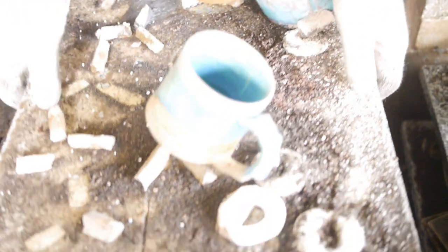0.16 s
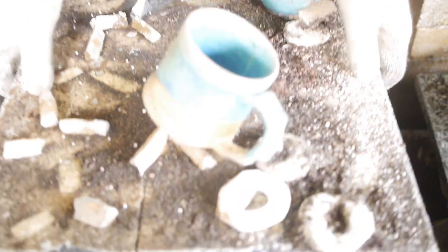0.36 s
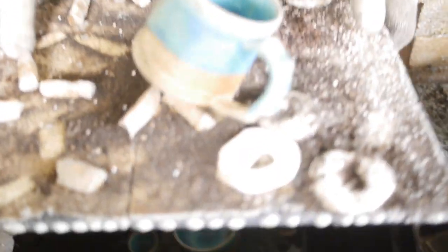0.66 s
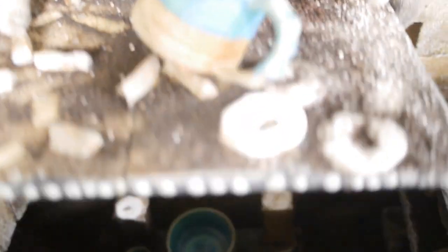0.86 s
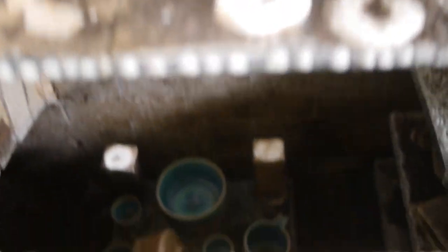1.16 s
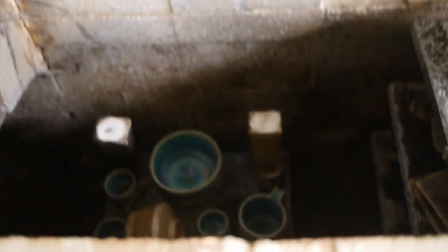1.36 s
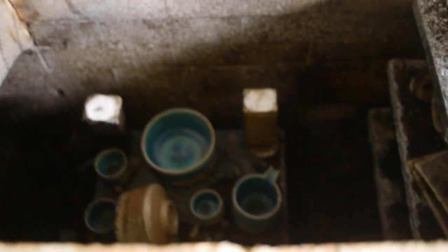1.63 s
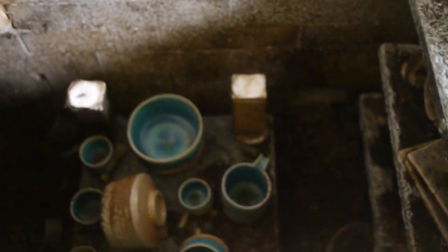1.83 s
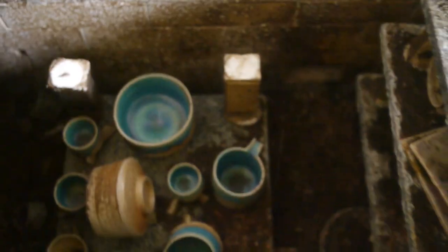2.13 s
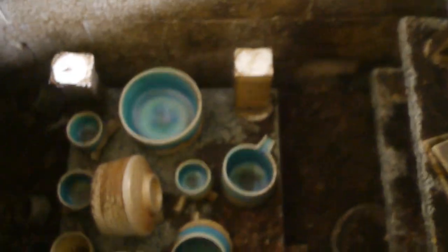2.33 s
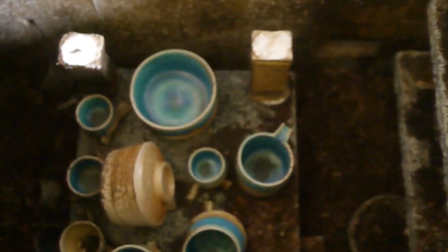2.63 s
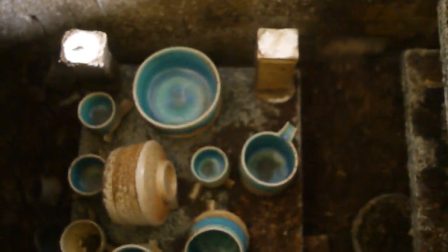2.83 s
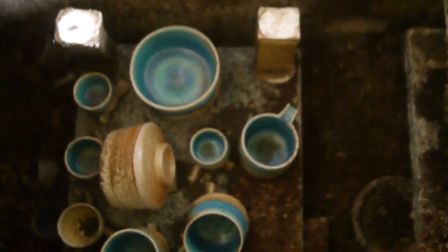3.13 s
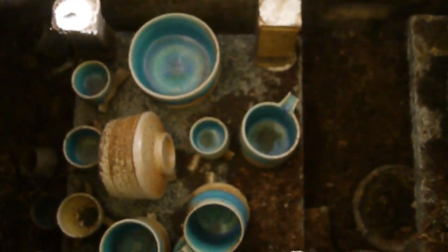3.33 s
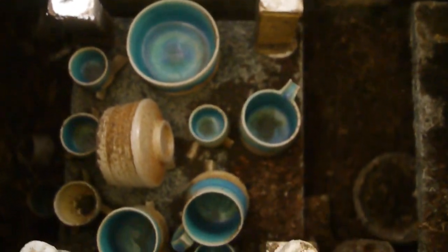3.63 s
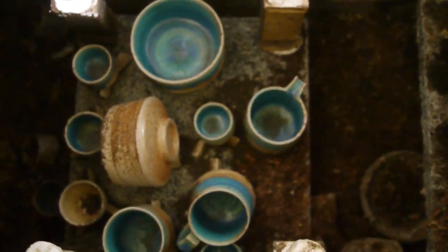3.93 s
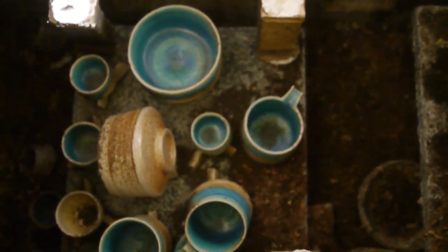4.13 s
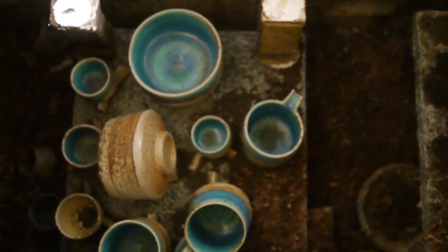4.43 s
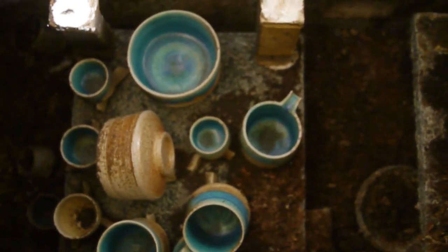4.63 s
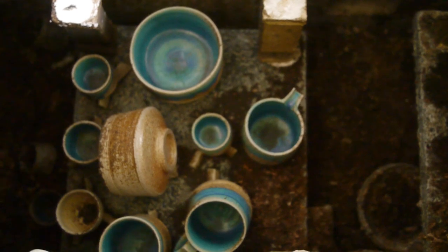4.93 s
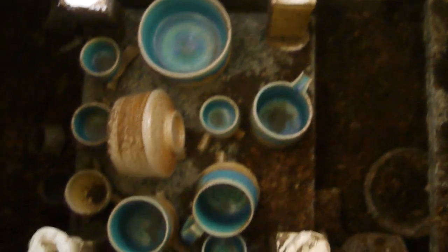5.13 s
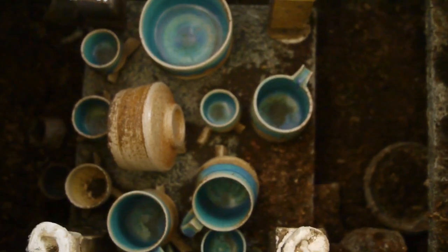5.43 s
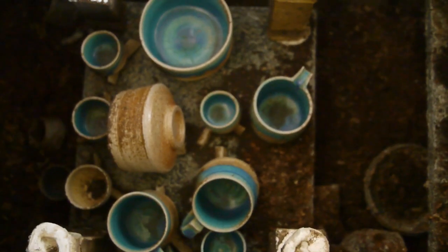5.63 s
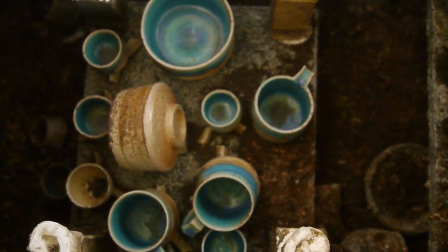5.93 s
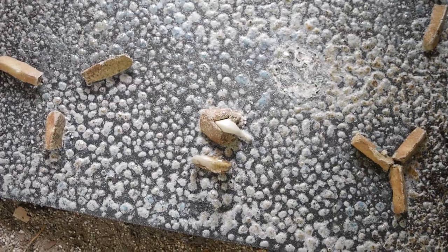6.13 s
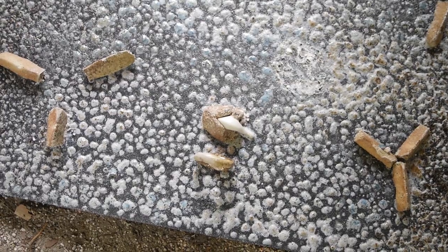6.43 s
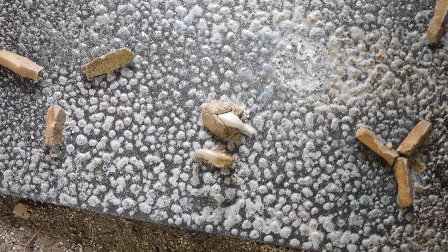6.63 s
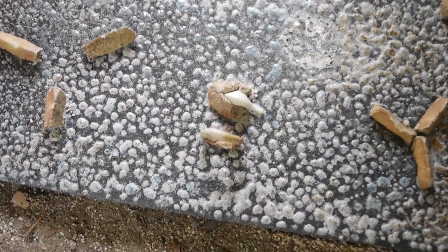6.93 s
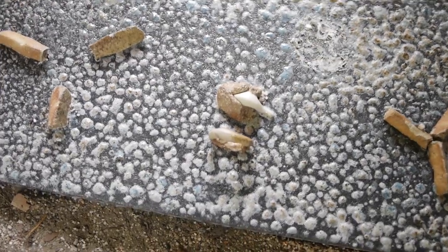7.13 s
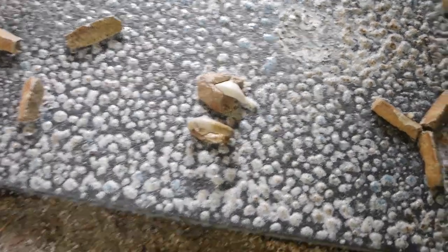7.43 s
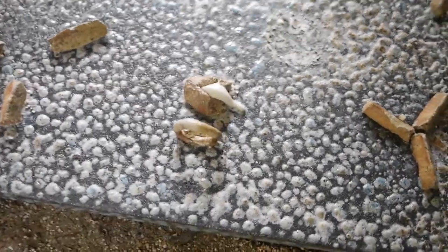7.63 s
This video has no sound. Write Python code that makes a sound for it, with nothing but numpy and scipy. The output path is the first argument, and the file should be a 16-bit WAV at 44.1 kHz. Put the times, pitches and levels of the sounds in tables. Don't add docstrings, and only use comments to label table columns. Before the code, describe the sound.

A soft, distant yard hush lies under everything. From 0.4 to 3.3 s only faint clay ticks and short dry scuffs occur, with a small cluster around 2.0 to 2.7 s. At 3.6 s grit begins to scrape; pots tap at 3.9 s, a cup clinks twice near 4.1 s, and the loudest sound, a bright jar clank with a rebound, comes at 4.26 s. From 4.57 to 5.1 s a pot is dragged, crunching grit and tapping rapidly, with firm bowl knocks at 4.62, 4.66 and 5.05 s and low shelf thuds. Scattered scuffs and glaze pings follow, then a double knock at 5.79 s. Brick walls add short echoes. At 6.08 s the place changes abruptly: quieter, less echo, tiny close clicks, dull hollow hand rubbing around 7.0 to 7.7 s, and firmer snaps at 7.59 s, as the hush slowly rises.

```python
import sys
import numpy as np
from scipy import signal
from scipy.fft import rfft, irfft, next_fast_len
from scipy.io import wavfile
from scipy.ndimage import uniform_filter1d

SR = 44100
rng = np.random.default_rng(int(sys.argv[2]) if len(sys.argv) > 2 else 0)


def gain_from_decibels(decibels):
    exponent = np.asarray(decibels, float) / 20
    return 10 ** exponent


def inscribe(sig):
    pcm = np.round(np.clip(np.atleast_2d(sig).T, -1, 1) * 32767)
    wavfile.write(sys.argv[1], SR, pcm.astype(np.int16))


N = 343165
CUT_S = 6.08

# (frequency [Hz], width [Hz], level [dB])
DRAGGED_MODES = [(892, 25, -2), (1124, 36, 0), (1340, 25, -8), (1600, 40, -8), (1898, 40, -1),
                 (1986, 40, -1), (2170, 37, -6), (2680, 46, -8), (2900, 51, -9), (3470, 60, -12),
                 (5070, 45, -14), (5780, 70, -21), (4100, 90, -15), (7050, 90, -13), (8620, 250, -20)]


def bowl():
    # (frequency [Hz], level [dB], time to fall 60 dB [s])
    modes = [(888, 1, 0.13), (1126, 0, 0.12), (1600, -18, 0.15), (1790, -7, 0.1), (1978, 0, 0.12),
             (2170, -3, 0.05), (3370, -17.5, 0.19), (3840, -35, 0.26), (4620, -28, 0.23), (5373, -35, 0.15),
             (6200, -28, 0.095), (7200, -36, 0.12), (8620, -40, 0.08)]
    # (time [s], peak [dB], crack over ring [dB], hardness [dB per octave], bounce [ms])
    blows = [
        (3.887, -29, 0, 4.5, 4.6),
        (3.966, -37.5, 6.5, -4, 5),
        (4.618, -25, 4, 5, 10.7),
        (4.664, -23.5, 1.5, 9, 20),
        (4.983, -28, 2, 9, 1.7),
        (5.049, -22, -4, 8, 3.5),
        (5.7865, -23, -5, 6.5, 4.2),
        (5.796, -26, -3, 0.5, 3),
    ]
    return knocks(blows, modes, rough=0.33, pan_db=1.5)


def jar():
    # (frequency [Hz], level [dB], time to fall 60 dB [s])
    modes = [(576, -20, 0.31), (1266, -17, 0.15), (1631, -20, 0.24), (2203, -16, 0.12), (2860, -15, 0.15),
             (3278, -15, 0.15), (3500, -11, 0.15), (3365, -7, 0.16), (3650, -5, 0.12), (4005, -15, 0.19),
             (5098, -34, 0.27), (5389, -23, 0.22), (5932, -17, 0.18)]
    # (time [s], peak [dB], crack over ring [dB], hardness [dB per octave], bounce [ms])
    blows = [
        (4.257, -16, 2, 0.72, 7),
        (4.274, -24, 2, 0, 9),
    ]
    return knocks(blows, modes, rough=0.35, pan_db=1.5)


def cup():
    # (frequency [Hz], level [dB], time to fall 60 dB [s])
    modes = [(960, -21, 0.1), (1550, 8, 0.073), (1870, -1, 0.27), (2387, 4, 0.09), (2800, -8, 0.042),
             (3010, 2, 0.09), (3170, -13, 0.029), (4080, 0, 0.036), (4830, -35, 0.33)]
    # (time [s], peak [dB], crack over ring [dB], hardness [dB per octave], bounce [ms])
    blows = [
        (4.0925, -30, 0.27, 0.15, 8),
        (4.108, -30, 2, 0, 25),
        (4.146, -31.5, 0.53, 0.19, 10),
        (4.163, -34, 0.27, 1.3, 6.7),
        (5.676, -40.5, 1.9, 7.8, 11),
    ]
    return knocks(blows, modes, rough=0.45, pan_db=1.0)


def knocks(blows, modes, rough, pan_db):
    out, t = np.zeros((2, N)), np.arange(SR // 4) / SR
    for s, peak_db, crack_db, hard_db, bounce_ms in blows:
        bounce = np.exp(-1000 * t / np.clip(bounce_ms, 1, 40)) * (1 - np.exp(-t / 0.0014))
        contact = rng.standard_normal(len(t)) ** 3 * bounce
        contact[:8] += 3.6 * np.hanning(8)
        pot = np.zeros((2, len(t)))
        for hz, db, t60 in modes:
            aim = rng.uniform(-1.6, 1.6, (2, 1)) * hz / 3000
            noise = spread(rng.standard_normal((2, len(t))), wide=0.82)
            cluster = evened(ring(noise, hz, 25 + 0.028 * hz))
            drive = abs(contact[:4000] @ np.exp(2j * np.pi * hz * t[:4000]))
            reach = np.clip(drive / np.linalg.norm(contact), .3, 3)
            fade = gain_from_decibels(db + hard_db * np.log2(hz / 2000) - 60 * t / min(t60, .3))
            tone = np.sin(2 * np.pi * hz * t + aim)
            pot += fade / reach * (tone + rough * cluster * gain_from_decibels(-60 * t / 4.2))
        ringing = signal.fftconvolve(contact[None], pot, axes=1)[:, :len(t)]
        spray = spread(rng.standard_normal((2, len(t))), wide=0.43)
        spray = spray * gain_from_decibels(-60 * t / 0.23) * (1 - np.exp(-t / 0.0029))
        crack = band(band(contact + 0.74 * spray, 490, 4500 * gain_from_decibels(hard_db)), 370, 5160)
        blow = ringing / abs(ringing).max() + gain_from_decibels(crack_db) * crack / abs(crack).max()
        add(out, s, gain_from_decibels(peak_db) * panned(blow, pan_db))
    return out


def drag():
    # (hardest push [s], level [dB], swell [s per 20 dB], fade [s per 20 dB], fine grit [dB])
    strokes = [(3.64, -67, 0.2, 0.3, 11.5), (3.719, -55, 0, 0.4, 1.5), (3.925, -51, 0, -0.5, -1),
               (3.979, -48, 0.16, 0.36, -2.5), (4.075, -58, -1, -0.5, -4.5), (4.33, -45.5, 0.5, 0.4, -24),
               (4.571, -37, .004, .4, -7), (4.622, -32, 0.06, -0.06, -15), (4.7, -36, 0.19, 0.03, -5.5),
               (4.92, -41, 0, .5, -22), (5.058, -31, 0.29, 0.0976, -4.5), (5.26, -47.5, -1.44, 0, 0),
               (5.52, -63, 0, 0, -3), (5.775, -48, 0, 0.28, -1.5), (5.85, -60, .03, 0.48, -14),
               (6.0, -57, -6, 0.2, -13)]
    # (frequency [Hz], level [dB per Hz])
    grit_colour = [(150, -7.5), (650, -6), (790, -16), (1100, -17.5), (1940, -7), (7040, -8.5),
                   (14000, -12.5), (16000, -35)]
    dust_db, dust_per_fine = -10.5, 1
    ring_share, ring_per_db = .7, .03
    t = np.arange(round(3.5 * SR), round(CUT_S * SR)) / SR

    lumps = gain_from_decibels(1.8 * evened(band(rng.standard_normal(len(t)), 24.4, 109)))
    size = gain_from_decibels(3.0 * np.minimum(rng.exponential(1, (2, len(t))), 2.5))
    size = size * (rng.random((2, len(t))) < 9000 / SR)
    grains = spread(rng.standard_normal((2, len(t))) * size * lumps, wide=0.67)

    pot, rim = np.zeros((2, 2, len(t)))
    for hz, width, db in DRAGGED_MODES:
        rocking = gain_from_decibels(3.0 * evened(band(rng.standard_normal(len(t)), 3, 25)))
        tone = gain_from_decibels(db) * ring(grains * rocking, hz, 0.8 * width) / np.sqrt(width)
        add(pot if hz < 4500 else rim, 0, tone)
    ringing, bright = evened(pot), evened(rim)

    rough = colour(grains, lambda hz: gain_from_decibels(read(grit_colour, hz)))
    coarse = evened(band(rough, 300, 5000))
    fine = evened(band(rough, 3800, 9500))
    dust = evened(band(band(grains, 7500, 14500), 7500, 16000))

    s, level_db, swell, fade, fine_db = np.transpose(strokes)
    swell, fade = swell[:, None], fade[:, None]
    push = peaks(level_db, s, swell, fade, t)
    fizz = peaks(level_db + fine_db, s, swell, fade, t)
    haze = peaks(level_db + dust_db + dust_per_fine * fine_db, s, swell, fade, t)
    push_db = 20 * np.log10(push)
    share = np.clip(ring_share + ring_per_db * (push_db + 35), 0, 1)
    pressed = np.clip((push_db + 50) / 15, 0, 1)
    body = 1.14 * np.sqrt(share) * ringing + np.sqrt(1 - share) * coarse
    out = np.zeros((2, N))
    add(out, t[0], gain_from_decibels(-5.0) * (push * body + fizz * (0.83 * pressed * bright + fine) + haze * dust))
    return out


def notes():
    # (time [s], peak [dB], brightness [dB per octave])
    foot_taps = [(4.5748, -44, 3), (4.6026, -30.5, 9), (4.6564, -28.5, -2), (4.6685, -30, -3),
                 (4.696, -35, -7), (4.7862, -34.5, 3), (4.8325, -51, 1), (4.856, -41, -3), (4.8836, -39, 0),
                 (4.9085, -61, -6), (4.928, -34, 3), (4.9375, -32, 7), (4.9631, -33, 11), (4.9821, -35, -4),
                 (5.0099, -29, 4), (5.0357, -32, 4), (5.062, -25.5, 2), (5.115, -43, 7.5), (5.137, -62, 2)]
    # (time [s], peak [dB], frequency [Hz], time to fall 60
    # dB [s])
    struck_tones = [(0.623, -52.5, 286, 0.086), (2.342, -44.5, 650, 0.07), (2.35, -51, 778, .2),
                    (2.35, -50.5, 1080, 0.26), (2.345, -54, 1780, .08), (2.37, -54, 1650, 0.092),
                    (2.41, -57, 682, .12), (3.887, -38, 1148, 0.087), (3.887, -47, 2970, 0.032),
                    (3.967, -38, 2510, .05), (3.967, -42, 1050, 0.07), (3.975, -44, 1975, 0.1),
                    (3.976, -50.5, 5600, .14), (3.97, -50, 723, 0.18), (4.092, -38.5, 4070, 0.11),
                    (4.101, -40, 1500, 0.13), (4.1, -42, 3010, 0.19), (4.1, -53, 5580, .12),
                    (4.11, -44, 3530, 0.21), (4.147, -36, 1780, .07), (4.165, -42, 1620, 0.067),
                    (4.169, -39.5, 1266, 0.15), (4.251, -37, 1940, .03), (4.2575, -11, 3700, 0.019),
                    (4.262, -23.5, 2480, 0.15), (4.615, -35.5, 662, 0.11), (4.984, -33.5, 2360, 0.1),
                    (5.79, -37.5, 1190, 0.22), (5.69, -52, 1126, 0.28), (5.6, -58, 1770, 0.28),
                    (3.967, -48.5, 1500, 0.25), (5.799, -39, 2930, 0.074), (5.841, -48.5, 496, 0.11),
                    (4.1, -47, 4970, .3), (4.1, -46, 580, 0.39), (4.6, -30, 2195, .06),
                    (4.62, -32, 2720, .07), (4.928, -34, 2130, 0.055), (5.115, -44, 2200, .12),
                    (6.04, -64, 704, 0.092), (7.733, -46, 620, 0.032)]
    # (time [s], peak [dB], frequency [Hz], time to fall 60
    # dB [s])
    more_tones = [(3.876, -50, 7050, .06), (3.876, -51, 9000, .1), (3.876, -52, 10900, .1),
                  (3.882, -51, 14500, .08), (4.258, -24, 2700, 0.055), (4.259, -28, 4550, .09),
                  (4.262, -33, 6000, .12), (4.619, -34, 6950, .07), (4.655, -40, 7050, .1),
                  (4.662, -37, 8600, .1), (4.59, -42, 5600, .06), (4.865, -43, 892, .4), (4.91, -48, 4100, .12),
                  (4.984, -32, 1125, 0.24), (4.98, -38, 6400, .05), (5.075, -41, 8500, .1),
                  (5.68, -49, 2720, .3), (5.698, -50, 8700, .08), (5.788, -40, 6100, .05),
                  (5.788, -42, 9800, 0.047), (5.79, -48, 14400, .06), (5.8, -45, 6200, 0.062),
                  (5.961, -57, 8200, .05), (6.358, -66, 14250, .12), (5.787, -30, 1980, .22),
                  (5.79, -33, 890, .18), (5.788, -42, 3800, .04), (4.79, -42, 1900, .2),
                  (5.035, -33, 1985, .15), (5.515, -56, 2720, .4), (2.76, -58, 655, .4), (.995, -60, 2690, .2)]
    tap_t60_s = 0.095
    out, t = np.zeros((2, N)), np.arange(SR // 4) / SR
    low_modes = [mode for mode in DRAGGED_MODES if mode[0] < 3200]
    hz, width, db = np.transpose(low_modes)[..., None]
    for s, peak_db, bright_db in foot_taps:
        grip_db = 2.7 * rng.standard_normal(hz.shape)
        start_db = db + grip_db + bright_db * np.log2(hz / 1500)
        modes = gain_from_decibels(start_db - 60 * t / tap_t60_s * width / 40) * np.sin(2 * np.pi * hz * t)
        add(out, s, gain_from_decibels(peak_db - 12.0) * modes.sum(0))
    for s, peak_db, hz, t60 in struck_tones + more_tones:
        add(out, s, gain_from_decibels(peak_db) * partial(t, hz, t60) * (1 - np.exp(-t / 0.00033)))
    return panned(out, pan_db=2.5)


def thud():
    # (frequency [Hz], width [Hz], level [dB])
    slab = [(242.3, 21, 4), (294, 17, 7), (338.3, 10.3, 6.5)]
    # (time [s], level [dB], deep part [dB])
    blows = [
        (3.889, -48.5, -62),
        (4.1, -50, -83),
        (4.17, -54, -78),
        (4.279, -39.5, -61),
        (4.58, -51, -67),
        (4.66, -44.5, -59),
        (4.87, -52.5, -66),
        (4.96, -48, -59),
        (5.049, -47.5, -61.5),
        (5.792, -46, -50),
    ]
    rise_s, fall_db_per_s, deep_fall_db_per_s = 0.011, 117, 69
    t = np.arange(round(3.7 * SR), round(CUT_S * SR)) / SR
    s, level_db, deep_db = np.transpose(blows)
    push, out = rng.standard_normal(len(t)), np.zeros(N)
    upper = sum(gain_from_decibels(db) * ring(push, hz, width) for hz, width, db in slab)
    upper = evened(band(upper + 0.17 * band(push, 146, 230), 153, 403))
    deep = evened(band(band(push, 70, 165), 70, 165))
    boom = peaks(level_db, s, rise_s, 20 / fall_db_per_s, t) * upper
    rumble = peaks(deep_db, s + 0.031, 3 * rise_s, 20 / deep_fall_db_per_s, t) * deep
    add(out, t[0], boom + rumble)
    return out


def crumbs():
    # (time [s], peak [dB], brightness [dB])
    kiln_ticks = [(0.745, -41, -5), (1.1994, -48, -9), (1.9193, -49, -7), (2.05, -43, 11),
                  (2.0614, -44, 17), (2.124, -39.5, -5), (2.4108, -44, 14), (2.436, -46.5, 16),
                  (2.4703, -56, -23), (2.6556, -49, -10), (2.6842, -42.5, -4), (3.786, -48, 25),
                  (3.829, -41, 23), (3.9665, -32, 0), (4.0496, -48, 20), (5.0505, -21, 5), (5.062, -23, -2),
                  (5.758, -45, 16), (4.092, -20.5, 1.5), (5.8994, -69.5, -2)]
    # (time [s], peak [dB], brightness [dB])
    close_ticks = [(6.109, -50, -3), (6.2333, -45, 0), (6.299, -59, 26), (6.3086, -52.5, 15.5),
                   (6.3388, -42.5, 24.5), (6.519, -44, 18), (6.5964, -47, 0), (6.635, -42, -3),
                   (6.6515, -46.5, -13), (6.871, -48, -5.5), (6.894, -49, -2), (7.054, -37.5, -10),
                   (7.1476, -38.5, -11.5), (7.2433, -44, -18.5), (7.364, -45.5, -2), (7.482, -43, -14.5),
                   (7.586, -31.5, -14), (7.592, -29, -8), (7.673, -37.5, 26), (7.7514, -51, -2)]
    # (time [s], peak [dB], ring [Hz], 0 for none, brightness [dB], length [ms])
    far_scuffs = [(0.444, -55, 5800, -1, 19), (0.49, -50, 1380, -3, 24), (0.607, -45, 2000, -5, 17),
                  (0.62, -39.5, 0, 0, 24), (0.9911, -49, 2690, -6, 29), (1.2644, -53, 680, -9, 27),
                  (1.8294, -55.5, 0, 5, 23), (2.0699, -45.5, 1060, -1, 39), (2.2493, -45, 0, 0.5, 26),
                  (2.3414, -52.5, 1513, -17, 32), (2.4005, -56, 1103, -13, 28),
                  (2.7544, -54, 655, -8.5, 57), (3.2794, -54, 1210, 3, 18)]
    # (time [s], peak [dB], ring [Hz], 0 for none, brightness [dB], length [ms])
    near_scuffs = [(3.8743, -42, 7150, 14.5, 28), (4.2565, -21, 3671, -4, 39), (4.464, -42, 3010, -6.5, 25),
                   (5.2074, -30, 2496, 0, 19.6), (5.2375, -35, 2780, 2.5, 7.6),
                   (5.2588, -39.5, 5070, -3.5, 27), (5.3854, -47.5, 5050, -1.5, 17),
                   (5.5151, -45, 5019.5, -1.5, 79), (5.5902, -47.5, 2720, -1, 69),
                   (5.678, -40, 6400, 3, 10), (5.698, -38, 2720, 3, 12), (3.72, -50, 0, 10, 20),
                   (4.05, -52, 0, 10, 20), (5.8694, -51, 5900, -11, 20), (5.9209, -44, 4000, 6, 14),
                   (6.03, -54.5, 999, -5.5, 40), (5.959, -52.5, 2278, 10, 15), (6.158, -49, 0, 0, 5.5),
                   (6.3435, -46, 0, 5, 4.4), (6.35, -47, 0, 5, 8), (6.365, -51, 0, 4, 10),
                   (6.7036, -53, 2830, -3, 13), (6.7331, -53.5, 3200, -3, 14), (7.5456, -47, 680, 0, 100),
                   (7.5792, -41, 783, -9, 15), (7.589, -35.5, 2742, -6.5, 8.3)]
    # (time [s], peak [dB], frequency [Hz], time to fall
    # 60 dB [s])
    pings = [(.487, -61, 3270, .6), (.545, -70, 10050, .12), (.632, -57, 3500, .2), (2.25, -53, 1900, .15),
             (2.83, -68, 9000, .15), (3.0, -68, 9050, .1), (3.875, -41, 3892, .36),
             (4.162, -28, 3009, .045), (4.258, -24, 3600, .13), (4.258, -28, 3713, .15),
             (4.258, -29, 3782, .12), (4.262, -45, 3027, .7), (4.262, -47, 3480, .5),
             (4.265, -27, 2299, .28), (4.325, -44, 5100, .08), (4.62, -38, 4300, .12),
             (5.05, -33, 7050, .11), (5.24, -41, 2900, .1), (5.8, -46, 4635, .25), (5.79, -45, 1340, .28),
             (6.225, -73, 9900, .12), (6.345, -58, 12200, .15)]
    tick_low_db, tick_high_db, scuff_low_db, scuff_high_db = -18.5, -21, -8, -7
    out, t = np.zeros((2, N)), np.arange(SR // 16) / SR
    for s, peak_db, bright_db in kiln_ticks + close_ticks:
        snap = rng.standard_normal(len(t)) * (np.exp(-t / 0.00022) + 0.13 * np.exp(-t / 0.01))
        snap[:2] += [2.5, 0]
        tick = three_bands(snap, tick_low_db - bright_db, tick_high_db + bright_db, top_hz=15400)
        add(out, s, gain_from_decibels(peak_db - 2.5) * panned(tick, pan_db=4.0 if s < CUT_S else -7.0))

    t = np.arange(SR // 4) / SR
    for s, peak_db, hz, bright_db, length_ms in far_scuffs + near_scuffs:
        low_db, high_db = scuff_low_db - bright_db, scuff_high_db + bright_db
        fade = np.exp(-1000 * t / np.clip(length_ms, 3, 90)) * (1 - np.exp(-t / 0.00028))
        scratch = spread(rng.standard_normal((2, len(t))) * fade, wide=0.56)
        tone = ring(scratch, hz, 10 + 0.036 * hz)
        tone_gain = (hz > 0) * 0.85 * (gain_from_decibels(low_db) if hz < 1500 else 1)
        tone = tone_gain * tone / abs(tone).max()
        add(out, s, gain_from_decibels(peak_db - 3.5) * (three_bands(scratch, low_db, high_db, top_hz=11900) + tone))

    t = np.arange(SR // 2) / SR
    for s, peak_db, hz, t60 in pings:
        add(out, s, gain_from_decibels(peak_db) * partial(t, hz, t60) * (1 - np.exp(-t / 0.00016)))
    return out


def rub():
    # (time [s], level [dB])
    strength = [
        (6.9, -81),
        (7.034, -66.5),
        (7.198, -64),
        (7.662, -72),
        (7.78, -81),
    ]
    s, level_db = curves(strength)
    noise, out = rng.standard_normal(len(level_db)), np.zeros(N)
    lumps = gain_from_decibels(3.6 * evened(band(rng.standard_normal(len(noise)), 10, 47)))
    hollow = ring(ring(noise, 820, 520), 920, 1000)
    friction = evened(hollow + 0.51 * band(noise, 230, 460))
    add(out, s, gain_from_decibels(level_db - 1.0) * lumps * friction)
    return out


def kiln(x):
    # (frequency [Hz], time to fall 60 dB [s])
    chamber = [(200, 0.25), (1000, 0.082), (4000, 0.14), (12000, 0.04)]
    taps = np.zeros((2, SR // 2))
    at = np.arange(60, SR // 2 - 20, 20) + rng.integers(0, 20, (2, (SR // 2 - 61) // 20))
    np.put_along_axis(taps, at, rng.choice([-1., 1.], at.shape), 1)
    taps[1] = 1.0 * taps[0] + 0.71 * taps[1]
    hz, t, z = signal.stft(taps, SR, nperseg=256)
    tail = signal.istft(z * gain_from_decibels(-60 * t / read(chamber, hz)[:, None]), SR, nperseg=256)[1]
    return signal.fftconvolve(x[None], tail / np.linalg.norm(tail[0]), axes=1)[:, :N]


def hush():
    # (frequency [Hz], level [dB per Hz])
    yard_colour = [(12, -70), (20, -56), (96, -17.5), (262, -3), (399, -6.5), (1120, -4.5), (3950, -10.5),
                   (12000, -32), (16000, -33)]
    # (frequency [Hz], level [dB per Hz])
    close_colour = [(15, -45), (137, -12), (575, -8.5), (800, -8.5), (1400, -13), (3500, -15.5),
                    (12200, -29.5), (16000, -37)]
    # (frequency [Hz], correlation [-1 to 1])
    likeness = [(60, 0.051), (150, 0.98), (380, 0.52), (950, 0.11), (2380, 0.53), (5980, -0.033),
                (15000, -0.27)]
    yard_db, close_db = -60.5, -64.5
    nearing_s, nearing_db_per_s = 7.1, 5
    frames, hz = N // 256 + 5, np.fft.rfftfreq(1024, 1 / SR)
    a, b, c, d, patches = rng.standard_normal((frames, 513, 5)).T
    patches = uniform_filter1d(uniform_filter1d(patches, size=14, axis=0), size=10, axis=1)
    patches = evened(patches)
    flicker = evened(uniform_filter1d(rng.standard_normal(frames), size=4))
    same = np.clip(read(likeness, hz), -1, 1)[:, None]
    left = a + 1j * b
    right = same * left + np.sqrt(1 - same ** 2) * (c + 1j * d)
    before, after = gain_from_decibels(read(yard_colour, hz)), gain_from_decibels(read(close_colour, hz))
    before, after = before / np.linalg.norm(before), after / np.linalg.norm(after)
    shape = np.where(np.arange(frames) * 256 / SR < CUT_S, before[:, None], after[:, None])
    z = np.array([left, right]) * shape * gain_from_decibels(1.14 * patches + 0.29 * flicker)
    x = evened(signal.istft(z, nperseg=1024, noverlap=768)[1][:, :N])
    t = np.arange(N) / SR
    swelling_db = close_db + nearing_db_per_s * np.maximum(t - nearing_s, 0)
    return x * gain_from_decibels(np.where(t < CUT_S, yard_db, swelling_db))


def ports(left, right):
    # (frequency [Hz], phase [rad])
    lead = [(0, 2), (860, -0.55), (2150, -0.84), (3960, -1.42), (5080, -1.87), (6290, -1.12), (9730, -1.6),
            (15300, -1.5)]
    # (frequency [Hz], level [dB])
    balance = [(60, -1), (150, -3), (380, -1.5), (950, -1.1), (2380, 0.5), (5980, 1.0), (15000, 3.5)]

    def tilt(hz):
        return np.sqrt(gain_from_decibels(read(balance, hz)) + 0j) * np.exp(.5j * read(lead, hz))

    return np.array([colour(left, tilt), colour(right, lambda hz: 1 / tilt(hz))])


def partial(t, hz, t60):
    wobble, wobble_hz = .15, 60
    turns = wobble_hz * rng.random((2, 1)) * t + rng.random((2, 1))
    waver = 1 + wobble * np.sin(2 * np.pi * turns).sum(0)
    aim = rng.uniform(-.35, .35, (2, 1)) * min(hz / 2000, 1)
    return waver * gain_from_decibels(-60 * t / max(t60, .01)) * np.sin(2 * np.pi * hz * t + aim)


def peaks(rows_db, seconds, swell, fade, t):
    coarse_t = t[::32]
    late = coarse_t - np.reshape(seconds, (-1, 1))
    rising, falling = -late / np.maximum(swell, .003), late / np.maximum(fade, .003)
    drop_db = 20 * np.where(late < 0, rising, falling)
    power = np.sum(gain_from_decibels(np.reshape(rows_db, (-1, 1)) - drop_db) ** 2, axis=0)
    return np.interp(t, coarse_t, np.sqrt(power))


def three_bands(x, low_db, high_db, top_hz):
    edges = (450, 1500), (1500, 6000), (6000, top_hz)
    parts = (band(band(x, *edge), *edge) for edge in edges)
    return sum(gain_from_decibels(db) * p / abs(p).max() for p, db in zip(parts, (low_db, 0, high_db)))


def spread(pair, wide):
    treble = band(pair, 2000, 8500)
    return np.array([pair[0], pair[0] + wide * (treble[1] - .5 * treble[0])])


def panned(x, pan_db):
    return x * gain_from_decibels(np.array([[pan_db], [-pan_db]]) / 2)


def ring(x, hz, width):
    r = np.exp(-np.pi * width / SR)
    return 2 * signal.lfilter([1 - r], [1, -r * np.exp(2j * np.pi * hz / SR)], x).real


def band(x, lo_hz, hi_hz):
    sos = signal.butter(2, [lo_hz, min(hi_hz, .45 * SR)], "band", fs=SR, output="sos")
    return signal.sosfilt(sos, x)


def colour(x, gain):
    size = next_fast_len(x.shape[-1])
    spectrum = rfft(x, size) * gain(np.fft.rfftfreq(size, 1 / SR))
    return irfft(spectrum, size)[..., :x.shape[-1]]


def read(points, hz):
    f, value = np.transpose(points)
    return np.interp(np.log(hz + 1), np.log(f + 1), value)


def curves(rows):
    s, *columns = np.transpose(rows)
    t = np.arange(round(s[0] * SR), round(s[-1] * SR)) / SR
    return [s[0]] + [np.interp(t, s, c) for c in columns]


def evened(x):
    return x / np.sqrt(np.mean(x ** 2) + 1e-20)


def add(mix, s, sound):
    part = mix[..., round(s * SR):][..., :sound.shape[-1]]
    part += sound[..., :part.shape[-1]]


def scene():
    pots = bowl() + jar() + cup() + drag() + notes()
    bits = crumbs()
    echo_gain = np.where(np.arange(N) / SR < CUT_S, 1, .4)
    echoes = gain_from_decibels(-9) * kiln((pots + 1.5 * bits).mean(0)) * echo_gain
    no_rumble = signal.butter(3, 78, "high", fs=SR, output="sos")
    close = signal.sosfilt(no_rumble, pots + thud() + rub() + bits + echoes)
    return ports(*(close + hush()))


def band_limit(x):
    return signal.sosfilt(signal.butter(12, 16300, fs=SR, output="sos"), x)


def record(dry):
    edge = signal.firwin(255, 15600, window=("kaiser", 8), fs=SR)
    mix = signal.oaconvolve(dry, edge[None], "same")
    return band_limit(mix)


dry = scene()
out = record(dry)
inscribe(out)
```